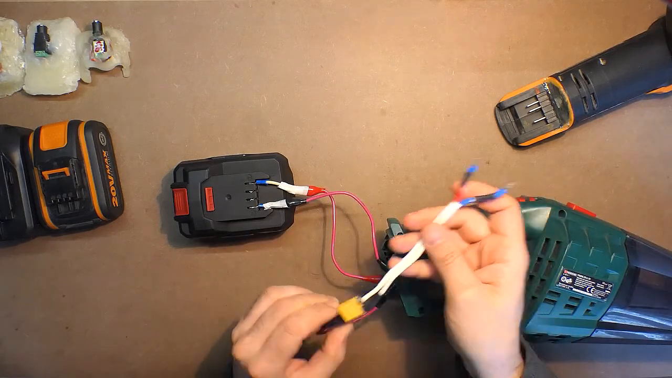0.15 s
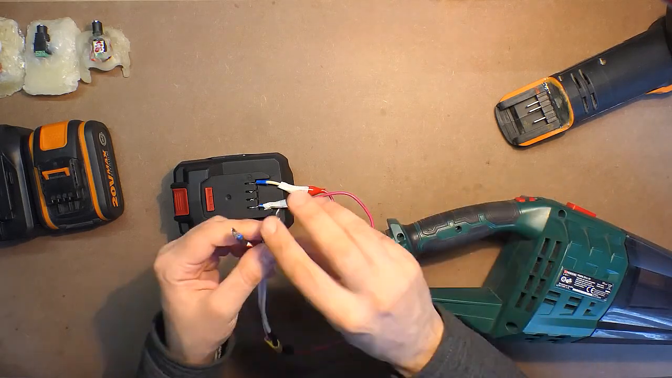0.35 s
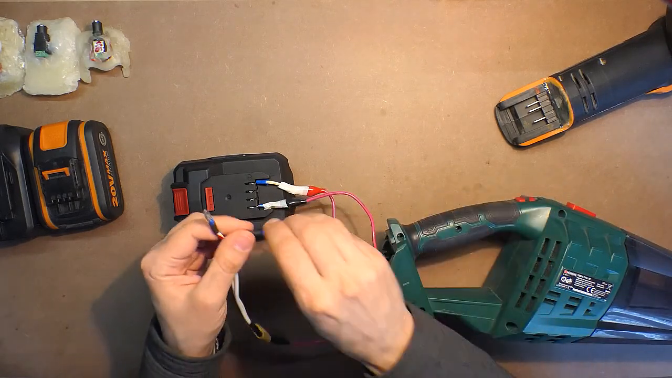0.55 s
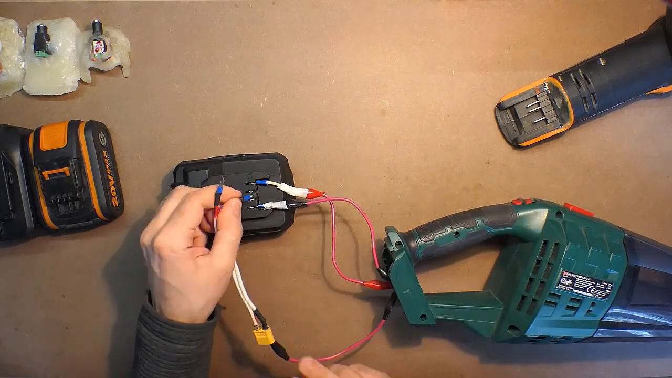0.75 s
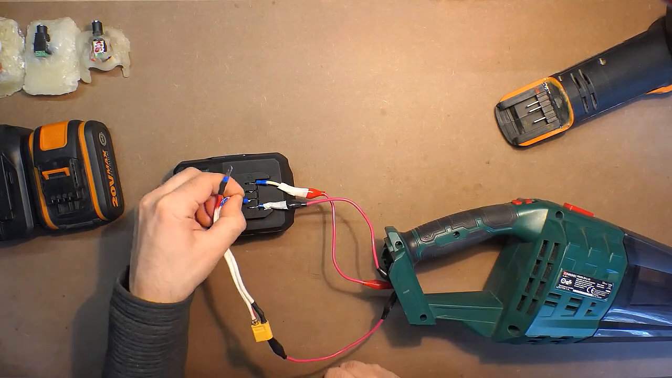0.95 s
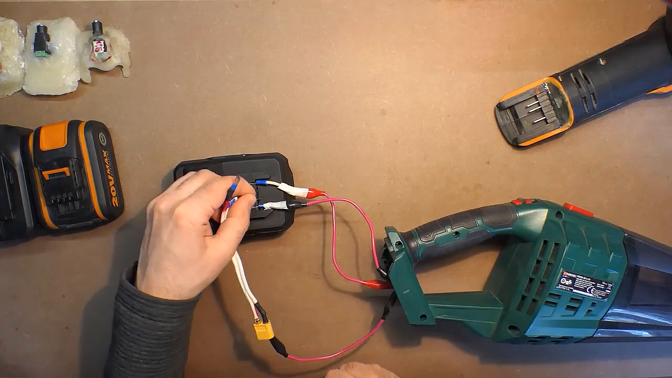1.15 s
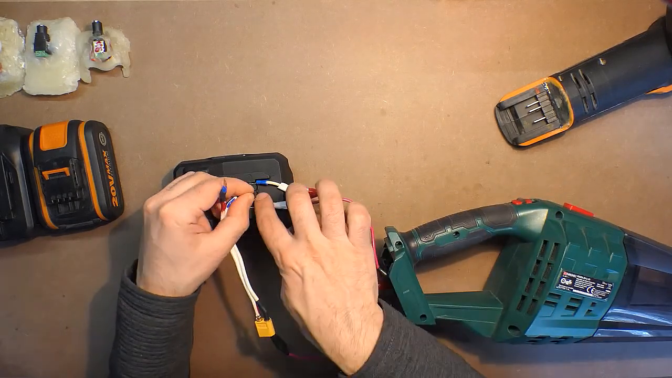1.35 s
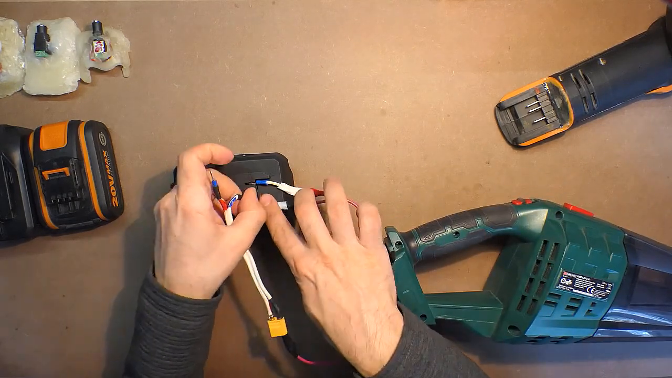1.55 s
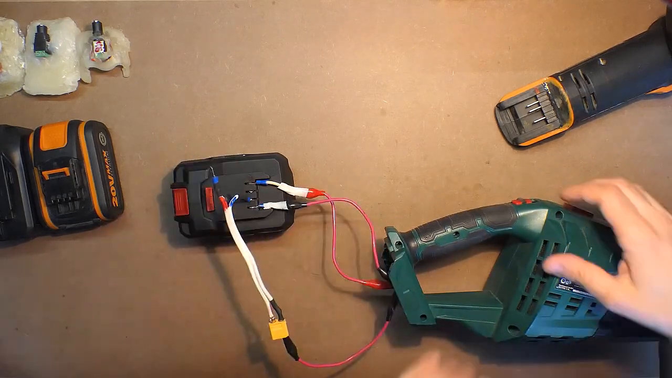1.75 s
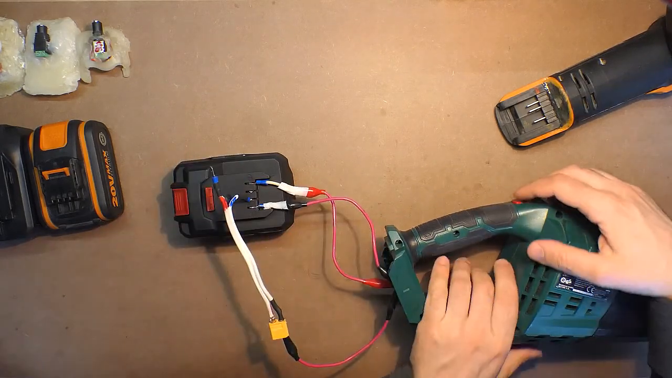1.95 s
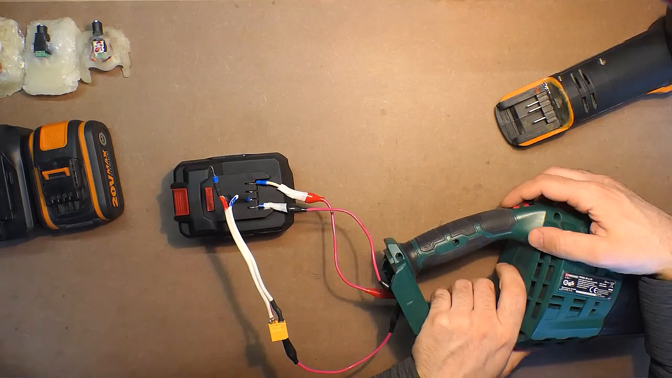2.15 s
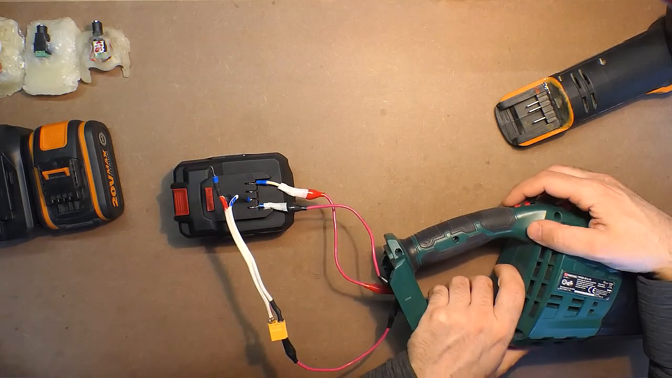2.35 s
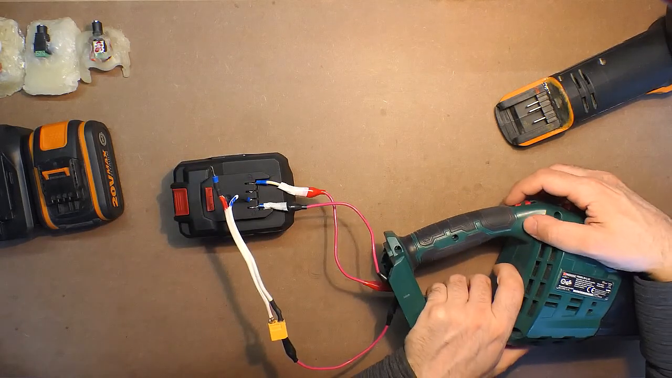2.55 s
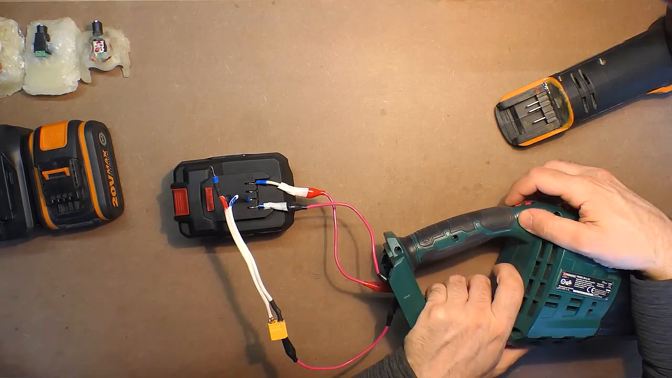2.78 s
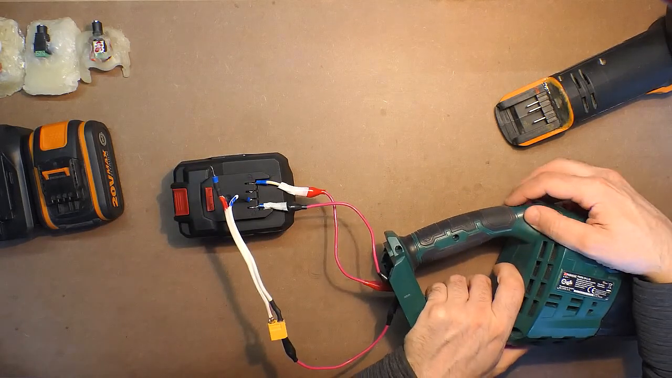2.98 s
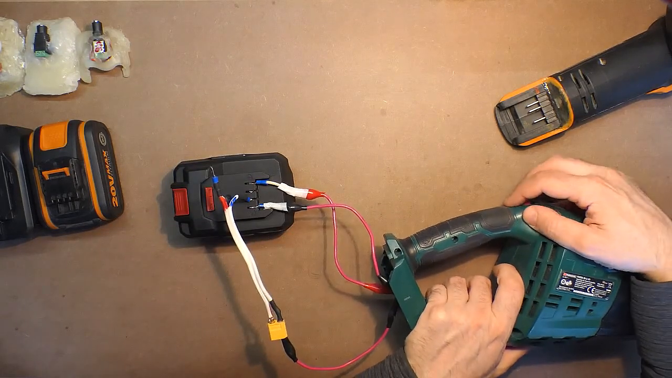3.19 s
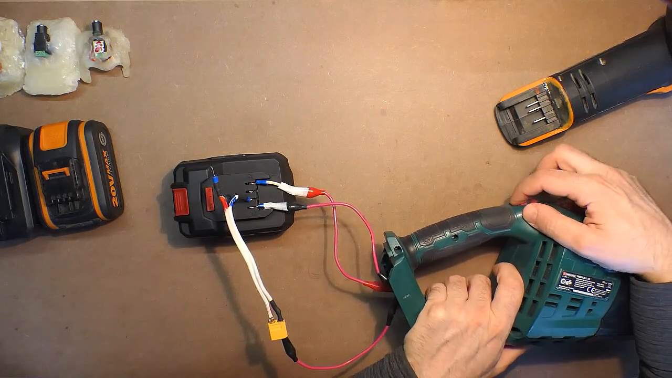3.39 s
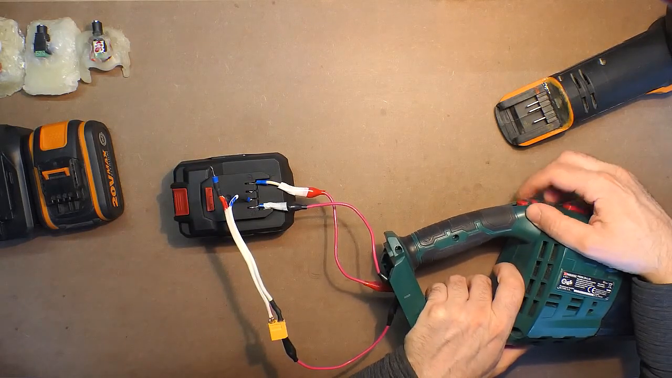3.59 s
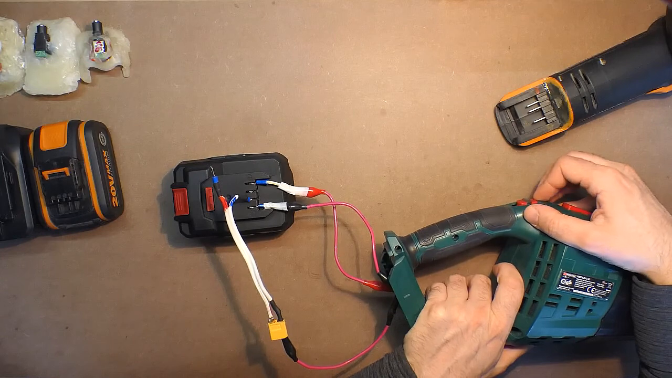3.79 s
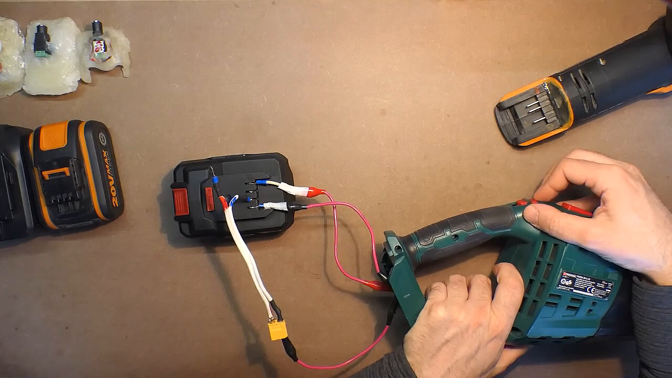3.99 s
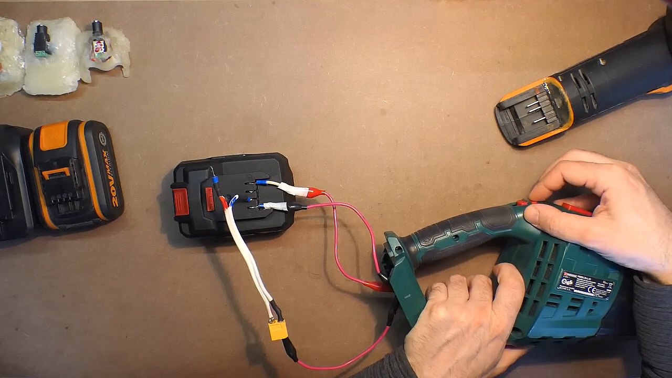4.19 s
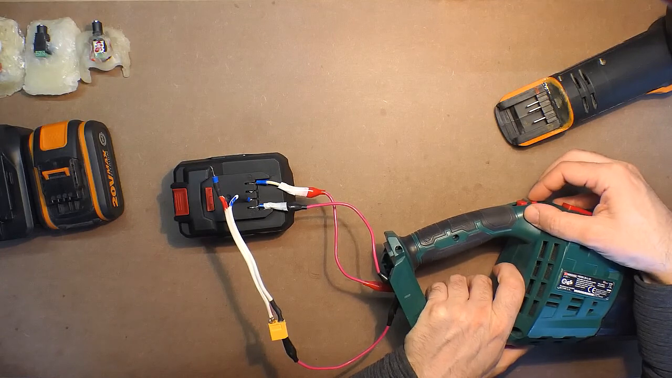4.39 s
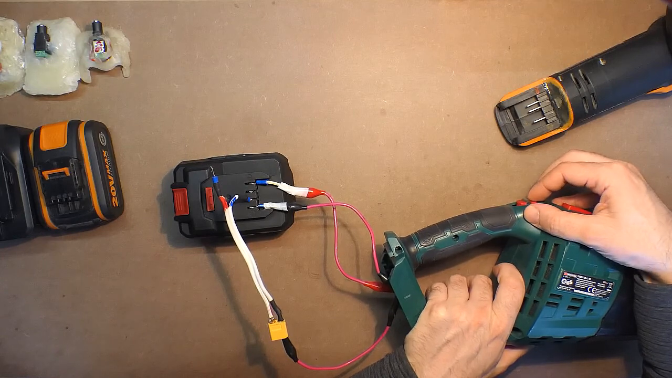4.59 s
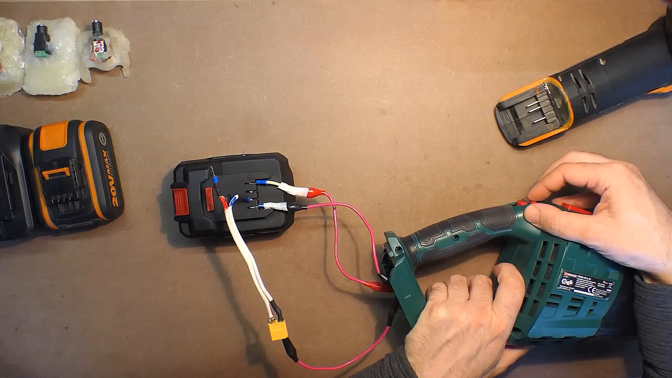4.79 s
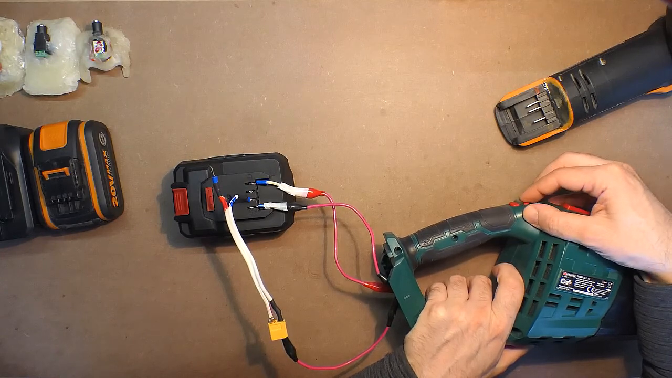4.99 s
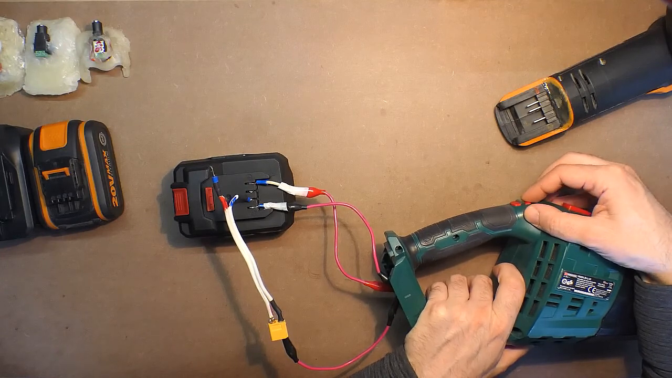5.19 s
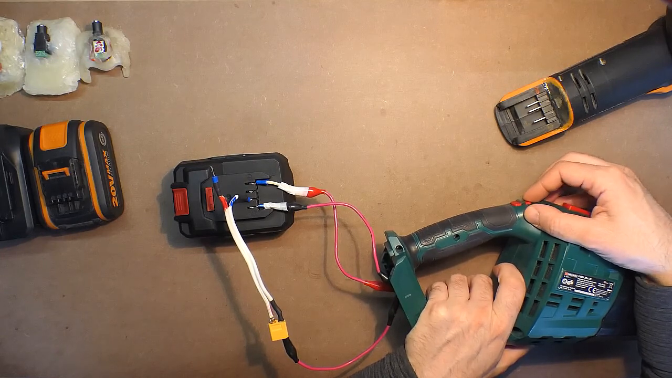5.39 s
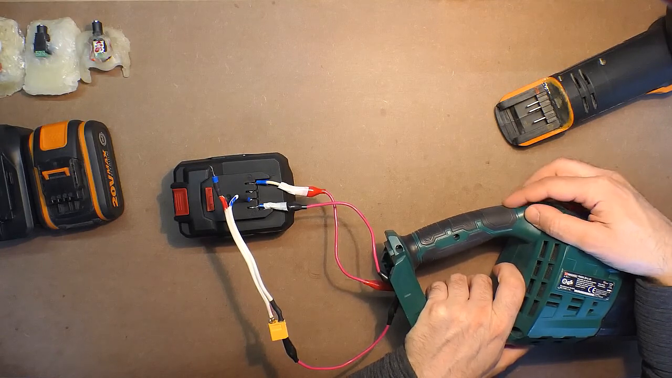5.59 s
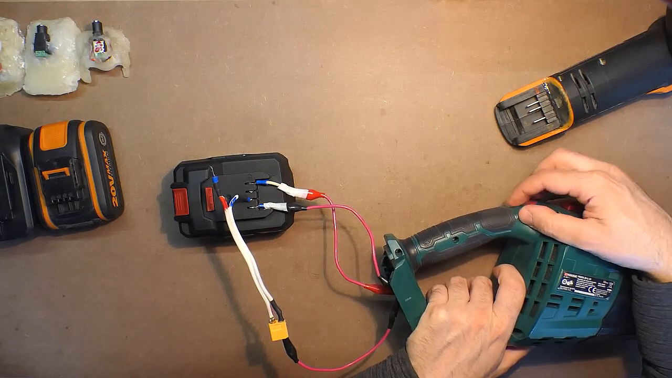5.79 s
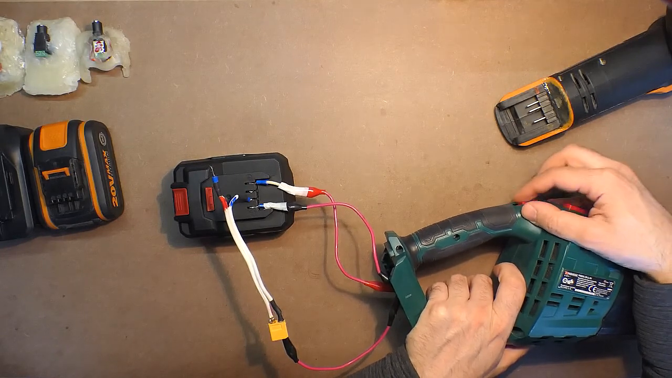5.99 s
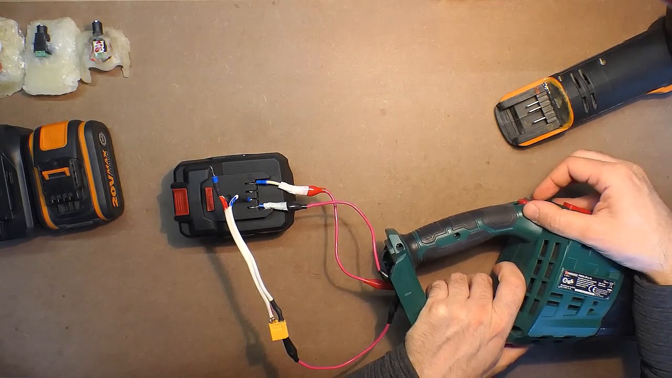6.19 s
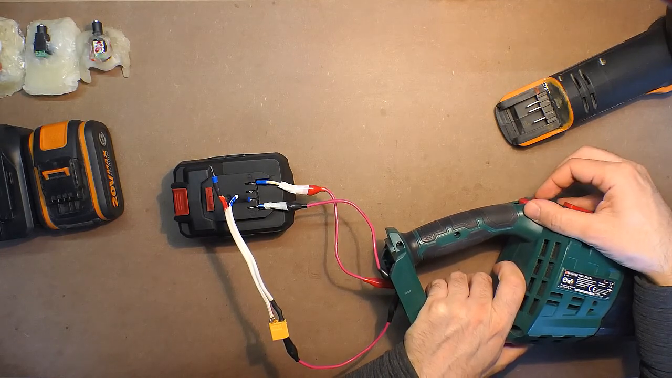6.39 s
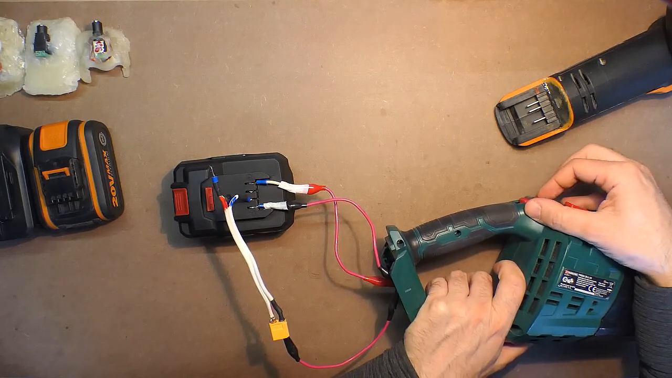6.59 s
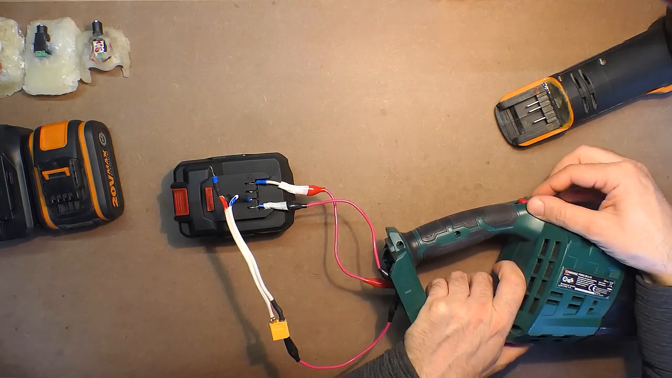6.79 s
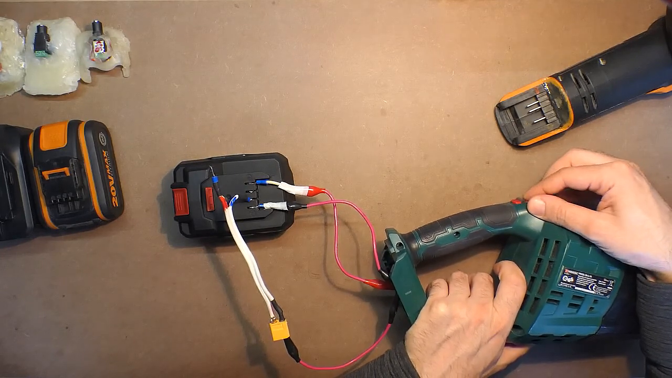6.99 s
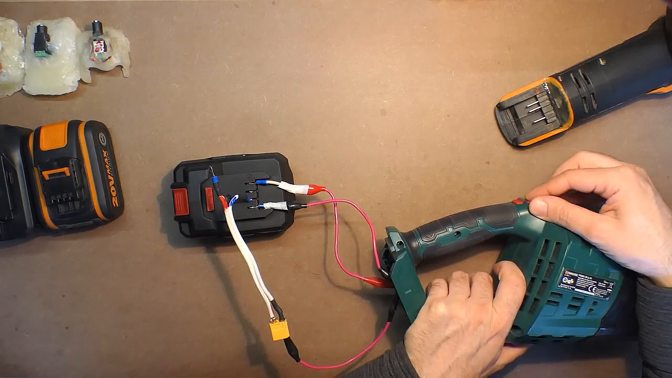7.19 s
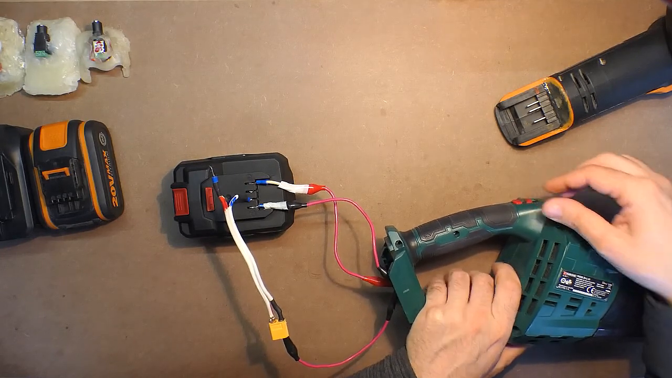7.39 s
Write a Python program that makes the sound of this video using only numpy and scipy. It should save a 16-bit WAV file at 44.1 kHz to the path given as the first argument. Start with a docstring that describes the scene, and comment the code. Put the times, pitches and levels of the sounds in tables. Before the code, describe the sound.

Wire clips tick faintly as they are attached to a battery, then sleeves rustle and hands knock softly on a hollow plastic case and the bench. A switch snaps and a small handheld vacuum spins up with a whine and a rush of air, runs briefly and coasts down. It snaps on again for a shorter burst and starts winding down. The microphone is close, in a small, quiet room.

```python
"""A workbench in a small room, heard through one close microphone. Sleeves rustle, leads tick as they are
clipped to a battery, and hands take hold of a handheld vacuum, exciting the modes of case and bench.
Twice its switch snaps on: the motor spins up to almost 400 turns a second, whines at harmonics of its
rotation over the turbulent rush of its fan, is let go and coasts down against drag and friction."""
import sys
import numpy as np
from scipy import signal
from scipy.fft import rfft, irfft
from scipy.io import wavfile

SR = 44100
rng = np.random.default_rng(int(sys.argv[2]) if len(sys.argv) > 2 else 0)


def output_pcm(signal):
    """Save a mono or channel-first signal as 16-bit PCM at the path in sys.argv[1].

    Samples are clipped to [-1, 1] before scaling.
    """
    pcm = np.clip(np.atleast_2d(signal).T, -1, 1) * 32767
    wavfile.write(sys.argv[1], SR, np.round(pcm).astype(np.int16))


N = 328545
TIME = np.arange(N) / SR
FREQ = np.maximum(np.arange(N + 1) * SR / (2 * N), 1)


def from_db(db):
    """Amplitude ratio: a factor of ten for every 20 dB."""
    return 10 ** (np.asarray(db) / 20)


def unit_rms(x):
    """Normalisation to unit mean power."""
    return x / np.sqrt(np.mean(x ** 2) + 1e-20)


def envelope_db(points):
    """Level envelope, interpolated linearly in time."""
    return np.interp(TIME, *np.transpose(points))


def spectrum_db(points):
    """Spectral envelope, interpolated over log frequency."""
    hz, db = np.transpose(points)
    return np.interp(np.log(FREQ), np.log(hz), db)


def resonance_db(resonances):
    """Resonance and antiresonance: Lorentzian peaks and dips in level."""
    return sum(db / (1 + (2 * (FREQ - hz) / width) ** 2) for hz, width, db in resonances)


def coloured(x, db):
    """Minimum-phase filtering: folding the cepstrum makes the given response causal."""
    cepstrum = irfft(np.log(from_db(db)))
    cepstrum[1:N] *= 2
    cepstrum[N + 1:] = 0
    return irfft(rfft(x, 2 * N) * np.exp(rfft(cepstrum)))[:N]


def bandpass(x, order, edges_hz):
    """Band limiting by a Butterworth filter."""
    return signal.sosfilt(signal.butter(order, edges_hz, "band", fs=SR, output="sos"), x + 1e-18)


def noise(db):
    """Gaussian noise with the given spectral density level."""
    return coloured(rng.standard_normal(N) * np.sqrt(SR / 2), db)


def drift(per_s):
    """Random modulation of unit power, with per_s new values a second."""
    knots = rng.standard_normal(4000)
    return unit_rms(np.interp(TIME * per_s, np.arange(len(knots)), knots))


def burst(s, t60):
    """Free decay: crowded modes struck at time s sum to exponentially damped noise."""
    out, age = np.zeros(N), TIME[:SR // 2]
    start = int(s * SR)
    decay = rng.standard_normal(len(age)) * from_db(-60 * age / t60)
    out[start:start + len(age)] = decay[:N - start]
    return out


def room(x, wet_db, t60, wall_hz):
    """Reverberation: dense, duller reflections follow the direct sound after 5 ms."""
    walls = signal.butter(2, wall_hz, fs=SR, output="sos")
    tail = signal.sosfilt(walls, burst(.005, t60)[:SR] + 1e-18)
    return x + from_db(wet_db) * signal.fftconvolve(x, tail / np.sqrt(np.sum(tail ** 2)))[:N]


# background spectrum: f/Hz, relative level/dB
ROOM_SPECTRUM = [(35, -14), (60, -15), (108, 3), (233, -18), (301, -14.5), (666, -35), (968, -21),
                 (1140, -37), (10300, -46), (16000, -42)]
def room_tone(level_db):
    """Stationary noise, strongest in the bass, forms the floor of the room."""
    return from_db(level_db) * unit_rms(noise(spectrum_db(ROOM_SPECTRUM)))


# cloth friction spectrum: f/Hz, relative level/dB
SLEEVE_SPECTRUM = [(200, -0.5), (520, 2.5), (800, -9.5), (1300, -5), (2100, -8), (4000, -12), (7000, -14),
                   (10000, -10), (12500, -15), (16000, -16)]
# sliding as the hands move to the case: t/s, level/dB
SLEEVE_ENVELOPE = [(0, -78.5), (1.78, -74.5), (1.85, -66.5), (1.97, -61), (2.2, -59.5), (2.25, -65),
                   (2.6, -65), (3.25, -70)]
def sleeves(grain_db):
    """Sliding friction: cloth and skin give an uneven hiss."""
    level_db = envelope_db(SLEEVE_ENVELOPE) + grain_db * drift(82)
    return unit_rms(noise(spectrum_db(SLEEVE_SPECTRUM))) * from_db(level_db)


# bench rumble spectrum: f/Hz, relative level/dB
RUMBLE_SPECTRUM = [(12, -36), (20, -6), (59, 1.5), (76, -6), (92, -8), (150, -17), (258, -26), (400, -33.5),
                   (520, -60), (880, -120)]
def bench_rumble(rest_db, lean_db, lean_at_s, rise_s, settle_s):
    """Structure-borne noise: the bench rumbles faintly, and more as arms lean on it, until they settle."""
    age = np.maximum(TIME - lean_at_s, 0)
    lean = np.minimum(age / rise_s, 1) * np.exp(-age / settle_s)
    return unit_rms(noise(spectrum_db(RUMBLE_SPECTRUM))) * (from_db(rest_db) + from_db(lean_db) * lean)


def touches(rows, t60, hollow_db, hollow_t60):
    """Impact excitation: each touch rings in its own band (t60 at 3 kHz); hollow plastic answers low."""
    out, hollow = np.zeros(N), np.zeros(N)
    for s, db, centre_hz, octaves in rows:
        edges = np.clip(centre_hz * 2 ** (np.array([-.5, .5]) * octaves), 10, .45 * SR)
        ring_s = t60 * (3000 / centre_hz) ** 0.32   # lows ring longer
        bandwidth_gain = np.sqrt(SR / 2 / np.ptp(edges))
        out += from_db(db) * bandwidth_gain * bandpass(burst(s, ring_s), 3, edges)
        hollow += from_db(db) * burst(s, hollow_t60)
    return out + from_db(hollow_db) * bandpass(hollow, 2, [100, 1000])


def lead_ticks(until_s, per_s, softest_db, range_db, t60):
    """Random impacts: the handled leads brush each other in faint ticks."""
    draws = rng.random((int(per_s * until_s), 2))
    ticks = sum(from_db(softest_db + range_db * size) * burst(when * until_s, t60) for when, size in draws)
    return bandpass(ticks, 1, [1500, 12000])


# resonances of the case and its air passages: f/Hz, bandwidth/Hz, gain/dB
CASE_MODES = [(453, 21, 7), (771, 19, 6.5), (1140, 174, 4.5), (1954, 250, 7), (2188, 95, 5),
              (2930, 232, 10), (3116, 134, 7), (3400, 246, 8.5), (3556, 240, 3), (3805, 226, 10),
              (4170, 200, 8.5), (4618, 160, 13.5), (4840, 155, 6.5), (5250, 300, 8.5), (5480, 180, 3),
              (5760, 60, 14.5), (6120, 88, 9), (6760, 130, 8), (7150, 300, 5), (8030, 170, 6),
              (8730, 72, 7), (9680, 850, 7.5), (11320, 380, 4), (13897, 160, 3.3)]
# clips and fingertips rubbing on plastic: t/s, level/dB, centre f/Hz, bandwidth/octaves
PLASTIC_RUBS = [(.03, -65, 500, 0.84), (.837, -67, 2300, 1.2), (.908, -63, 1900, 1.3),
                (1.135, -63, 3400, 0.54), (1.185, -63, 2200, 1.3), (1.615, -64.5, 5500, 2.7),
                (2.07, -59.5, 500, 1.0), (2.452, -47, 158, 1.0), (2.61, -60, 450, 2.4),
                (2.84, -56, 350, 1.2)]
# metal clips on the battery contacts: t/s, level/dB, centre f/Hz, bandwidth/octaves
CLIP_IMPACTS = [(.854, -56.5, 2390, 1.5), (.9544, -43.5, 3000, 3.0), (.962, -48, 1700, 1.5),
                (1.1493, -45, 5570, 2.9), (1.174, -45, 2000, 1.9), (1.1826, -44.5, 2800, 2.9),
                (1.2436, -54, 3000, 5), (1.3237, -57, 7500, 1.5), (1.5499, -54, 2600, 0.89),
                (1.5668, -54.5, 3200, 3.9)]
# fingers on hollow plastic: t/s, level/dB, centre f/Hz, bandwidth/octaves
FINGER_KNOCKS = [(1.558, -46, 169, 1), (2.157, -52, 730, 1.9), (2.3237, -45.5, 2420, 1.2),
                 (2.4437, -39, 338, 2.5), (2.5912, -49, 3000, 3.4), (2.8315, -50, 2180, 3.2),
                 (2.9673, -47, 2880, 2)]
def taps(ring_share):
    """Contact noise: hard clips tick brightly, soft fingers knock dully, faintly coloured by the case."""
    clips = touches(CLIP_IMPACTS, t60=0.025, hollow_db=0.5, hollow_t60=0.076)
    leads = lead_ticks(until_s=1.7, per_s=17, softest_db=-72, range_db=6, t60=.04)
    rubs = touches(PLASTIC_RUBS, t60=0.13, hollow_db=-8, hollow_t60=.1)
    fingers = touches(FINGER_KNOCKS, t60=0.029, hollow_db=-2.5, hollow_t60=0.1)
    contacts = coloured(clips + leads + rubs + fingers, ring_share * resonance_db(CASE_MODES))
    return room(contacts, wet_db=-12, t60=0.089, wall_hz=11500)


# blows of the hands on the bench: t/s, level/dB
HAND_BUMPS = [(0.032, -40.5), (.945, -43), (1.155, -42), (1.19, -37.5), (1.56, -32), (2.12, -39),
              (2.18, -36), (2.454, -26), (2.63, -33), (3.07, -41)]
# modes of the bench top: f/Hz, gain/dB, T60/s
BENCH_MODES = [(47.8, 0.5, 0.31), (64.8, 8, 0.3), (113, 0, 0.14)]
def bench_thuds(kicks, contact_s):
    """Damped oscillators: soft blows from the hands and kicks from the case drive the bench's low modes."""
    blows, out = np.zeros(N), 0
    for s, db in HAND_BUMPS + kicks:
        blows[int(s * SR)] = from_db(db)
    push = np.hanning(int(contact_s * SR))   # a soft contact presses in and lets go smoothly
    force = signal.fftconvolve(blows, push / push.sum(), "same") + 1e-18
    for hz, db, t60 in BENCH_MODES:
        radius, omega = from_db(-60 / (t60 * SR)), 2 * np.pi * hz / SR
        out += from_db(db) * signal.lfilter([1, -1], [1, -2 * radius * np.cos(omega), radius ** 2], force)
    return out


# the switch snapping on and off: t/s, relative level/dB
SWITCH_SNAPS = [(3.2806, -5.5), (4.903, -18), (5.8464, -6), (6.972, -15.5)]
# spectrum of a snap: f/Hz, relative level/dB
SNAP_SPECTRUM = [(100, -12), (400, -8.5), (900, -13.5), (1400, -10), (2800, 0.5), (4000, -2.5), (5500, -3),
                 (8300, 0), (10500, -0.5), (13000, -7.5), (16000, -10)]
def switch(travel_s, travel_db, snap_t60):
    """Snap-through: the slider scrapes for an instant, then its spring flips and the case cracks."""
    hits = sum(from_db(db) * (burst(s, snap_t60) + from_db(travel_db) * burst(s - travel_s, t60=0.038))
               for s, db in SWITCH_SNAPS)
    return room(coloured(hits, spectrum_db(SNAP_SPECTRUM) + 7), wet_db=-10, t60=0.24, wall_hz=11300)


# spells under current: on t/s, off t/s, starting kick level/dB, stopping kick level/dB
MOTOR_RUNS = [(3.381, 4.906, -31, -26), (5.847, 6.977, -26, -22.5)]
def rotor(top_hz, spin_up_s, creep_hz, creep_s, drag_hz_per_s, friction_hz_per_s):
    """Torque balance gives turns per second and current (1 at stall, 0 at top speed or switched off)."""
    turns, current = np.zeros(N), np.zeros(N)
    balance_hz = top_hz * np.sqrt(friction_hz_per_s / drag_hz_per_s)   # here drag equals friction
    for on_s, off_s, _, _ in MOTOR_RUNS:
        on, off = int(on_s * SR), int(off_s * SR)
        # driven: a leap towards top speed, then a slow creep
        age = TIME[:N - on]
        leap = (top_hz - creep_hz - turns[on]) * np.exp(-age / spin_up_s)
        turns[on:] = top_hz - leap - creep_hz * np.exp(-age / creep_s)
        current[on:off] = 1 - turns[on:off] / top_hz
        # coasting: square-law fan drag plus constant friction
        coast = np.arctan(turns[off] / balance_hz) - friction_hz_per_s * TIME[:N - off] / balance_hz
        turns[off:] = balance_hz * np.tan(np.maximum(coast, 0))
    return np.maximum(turns, 0), current


# a kick and its rebound: delay t/s, relative level/dB
RECOIL = [(0.015, -3.5), (.066, -2)]
def torque_kicks():
    """Reaction torque: each start and stop kicks the case, which rocks back. Gives (t/s, level/dB)."""
    jumps = [jump for on_s, off_s, on_db, off_db in MOTOR_RUNS
             for jump in ((on_s, on_db), (off_s, off_db))]
    return [(s + delay_s, jump_db + db) for s, jump_db in jumps for delay_s, db in RECOIL]


def case_noise(spectrum):
    """Source and filter: noise rings in the case, which is too small to radiate deep bass."""
    bass_loss_db = 10 * np.log10(1 + (90 / FREQ) ** 4)
    return noise(spectrum_db(spectrum) + resonance_db(CASE_MODES) - bass_loss_db)


# brush friction spectrum: f/Hz, density level/dB
BRUSH_SPECTRUM = [(110.0, -66), (300.0, -62), (600.0, -62), (1500.0, -71.5), (2500.0, -68.5), (4000.0, -78),
                  (4900.0, -74.5), (5600.0, -89), (9000.0, -76.5), (15600.0, -91)]
def brush_scrape(speed, current, gain_db, inrush_db, chatter_db, chatter_s):
    """Sliding contact: brushes scrape with speed, grind under starting current, chatter when it is cut."""
    released = sum((TIME > off_s) * np.exp(-np.abs(TIME - off_s) / chatter_s)
                   for _, off_s, _, _ in MOTOR_RUNS)
    scrape = speed ** 0.96 * from_db(chatter_db * released)
    grind = from_db(inrush_db) * current ** 2.6
    return from_db(gain_db) * case_noise(BRUSH_SPECTRUM) * (scrape + grind)


def cogging(angle, turns, current, level_db, whistle_db, rough_db, blur_rad):
    """Torque ripple: the five slots of the accelerating rotor jerk the case in a short rising growl."""
    slot_phase = 5 * angle + blur_rad * drift(150)
    growl = np.sin(slot_phase) * current ** 1.9
    whistle = np.sin(3 * slot_phase) * current ** 0.42
    jerks = (growl + from_db(whistle_db) * whistle) * from_db(rough_db * drift(220))
    return from_db(level_db) * jerks * np.clip(turns / 105, 0, 1) ** 4


# airflow spectrum at full speed: f/Hz, density level/dB
FAN_SPECTRUM = [(110.0, -71.5), (250.0, -67), (450.0, -58.5), (1000.0, -69.5), (1550.0, -66.5),
                (3000.0, -64), (4300.0, -70.5), (6400.0, -68), (10000.0, -65.5), (12500.0, -68),
                (14500.0, -76), (15600.0, -73.5)]
def fan_rush(speed, gain_db):
    """Aerodynamic noise: the rush of the fan grows as a steep power of its speed."""
    return from_db(gain_db) * case_noise(FAN_SPECTRUM) * speed ** 3.72


FULL_SPEED_HZ = 396
# main tones: harmonic number, level/dB, loss per halving of speed/dB, fade-out rotation f/Hz
MAIN_HARMONICS = [(1, -36, 16.5, 221), (2, -39, 3, 205), (3, -35.5, 10, 195), (5, -39.5, 5, 150),
                  (7, -36, 8.5, 170), (10, -39.5, -4.5, 244)]
# weaker tones: harmonic number, level/dB, loss per halving of speed/dB
WEAK_HARMONICS = [(4, -51.5, -3.5), (6, -54, -6.5), (8, -45.5, 19), (9, -51, -6.5), (11, -66, -5),
                  (14, -42.5, 24), (35, -53, 10)]
# peaks and nulls on the main tones' way out of the case: f/Hz, bandwidth/Hz, gain/dB
PATH_RESONANCES = [(356.5, 86, 10.5), (397.8, 28, -7.5), (700, 21, -16), (1007, 168, -17.5),
                   (1127, 190, 8.5), (1644, 225, -20), (1830, 300, 10), (2740, 530, 4.5), (3470, 360, -9)]
# slow swell of the main tones above the second harmonic: t/s, level/dB
UPPER_SWELL = [(3.87, -1.5), (4.2, 3), (4.55, 0.5), (4.95, 0), (6.0, -2), (6.45, 0.5), (6.72, 2.5),
               (6.85, -10), (6.97, 0)]
def whine(angle, speed, waver_db, beat_db, flutter_db, wander_db, main_blur_rad, weak_blur_rad):
    """Harmonics of rotation: imbalance, commutator and blades give tones that turbulence modulates."""
    # below full speed the tones glide and beat against their own reflections
    gliding = np.clip(10 * (1 - speed), 0, 1)

    def tone(k, depth_db, blur_rad):
        """Harmonic k under random phase and amplitude modulation."""
        phase = k * angle + rng.uniform(0, 2 * np.pi)
        jitter = k * blur_rad * (drift(35) + 1.3 * gliding * drift(90))
        flicker_db = (depth_db + beat_db * gliding) * np.tanh(drift(20))
        return np.sqrt(2) * np.sin(phase + jitter) * from_db(flicker_db)

    out, turns = 0, speed * FULL_SPEED_HZ
    path_db, case_db = resonance_db(PATH_RESONANCES), resonance_db(CASE_MODES)
    swell_db = envelope_db(UPPER_SWELL)
    for k, db, fall_db, lowest_hz in MAIN_HARMONICS:
        level_db = db + fall_db * np.log2(speed) + np.interp(k * turns, FREQ, path_db)
        level_db += wander_db * np.tanh(drift(5)) + swell_db * (k > 2)
        fade = 1 / (1 + (lowest_hz / turns) ** 20)
        out += tone(k, waver_db, main_blur_rad) * from_db(level_db) * fade
    for k, db, fall_db in WEAK_HARMONICS:
        flare_db = np.interp(k * turns, FREQ, case_db)   # a tone flares as it crosses a resonance
        out += tone(k, flutter_db, weak_blur_rad) * from_db(db + flare_db + fall_db * np.log2(speed))
    return out * np.clip(speed / 0.63, 0, 1)


# spectrum of the loose case buzzing: f/Hz, density level/dB
BUZZ_SPECTRUM = [(500, -84), (2200, -86), (3100, -63.5), (4000, -95), (4800, -65.5), (5700, -90),
                 (15000, -100)]
def case_buzz(turns, critical_hz, width_hz):
    """Critical speed: the rotor shakes the case hardest as it passes resonance, going up or down."""
    return case_noise(BUZZ_SPECTRUM) * np.exp(-((turns - critical_hz) / width_hz) ** 2)


def motor(throb_depth):
    """Rotating machinery: one shaft drives every source and modulates the noises once a turn."""
    turns, current = rotor(top_hz=398.1, spin_up_s=.094, creep_hz=14.2, creep_s=.522,
                           drag_hz_per_s=326, friction_hz_per_s=63.2)
    speed = np.maximum(turns, 1) / FULL_SPEED_HZ
    angle = 2 * np.pi * np.cumsum(turns) / SR
    air = fan_rush(speed, gain_db=-0.5)
    brushes = brush_scrape(speed, current, gain_db=0.5, inrush_db=-1, chatter_db=2, chatter_s=0.14)
    buzz = case_buzz(turns, critical_hz=348, width_hz=27)
    tones = whine(angle, speed, waver_db=2.5, beat_db=4.5, flutter_db=4, wander_db=2,
                  main_blur_rad=0.041, weak_blur_rad=0.046)
    growl = cogging(angle, turns, current, level_db=-20, whistle_db=-14.5, rough_db=3, blur_rad=0.4)
    throb = 1 + throb_depth * np.cos(angle)
    turning = np.clip((turns - 2) / 10, 0, 1)
    return ((air + brushes + buzz) * throb + tones + growl) * turning


def scene():
    """Superposition: all sources add at one microphone, the same in both channels."""
    mono = motor(throb_depth=0.094)
    mono += switch(travel_s=0.0016, travel_db=-12.5, snap_t60=0.048)
    mono += taps(ring_share=0.049)
    mono += room_tone(level_db=-69)
    mono += bench_thuds(torque_kicks(), contact_s=0.019)
    mono += sleeves(grain_db=1)
    mono += bench_rumble(rest_db=-59.5, lean_db=-48, lean_at_s=1.99, rise_s=0.18, settle_s=1.15)
    return np.array([mono, mono])


def record(dry):
    """Saturation and band limiting: the loudest snaps are rounded off and the top treble is cut."""
    ceiling, cutoff_hz = 0.85, 15800
    rounded = dry / (1 + (dry / ceiling) ** 4) ** (1 / 4)
    return signal.sosfilt(signal.ellip(12, .1, 80, cutoff_hz, fs=SR, output="sos"), rounded)


dry = scene()
out = record(dry)
output_pcm(out)
```